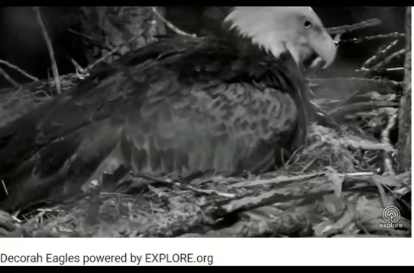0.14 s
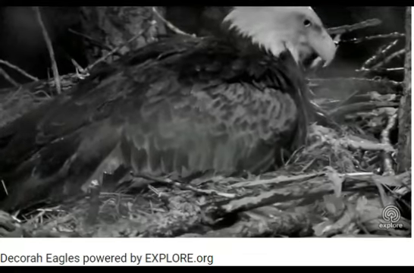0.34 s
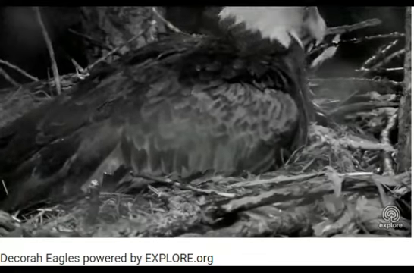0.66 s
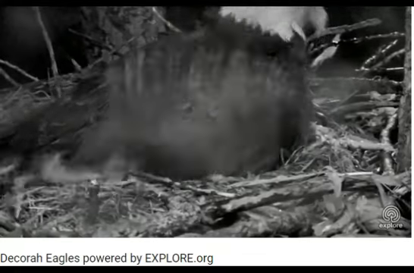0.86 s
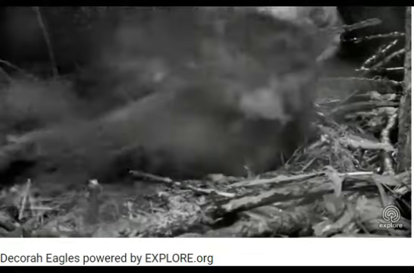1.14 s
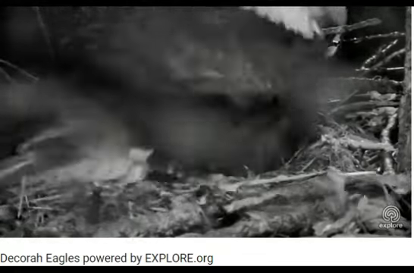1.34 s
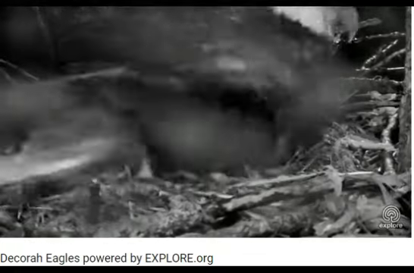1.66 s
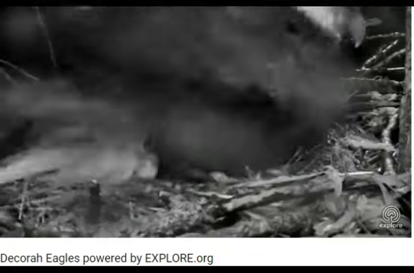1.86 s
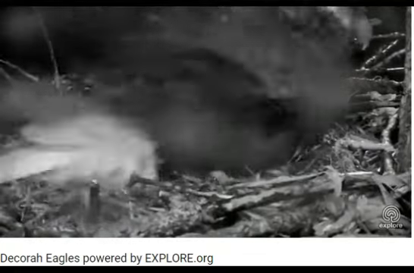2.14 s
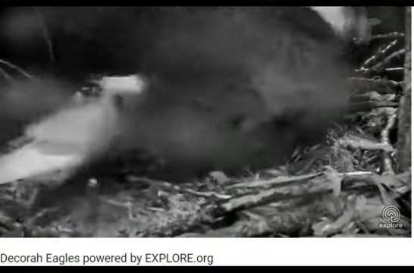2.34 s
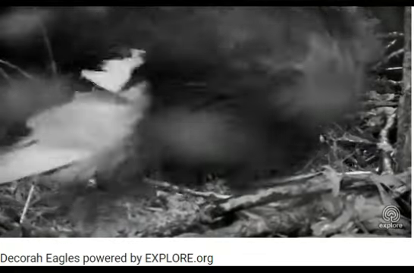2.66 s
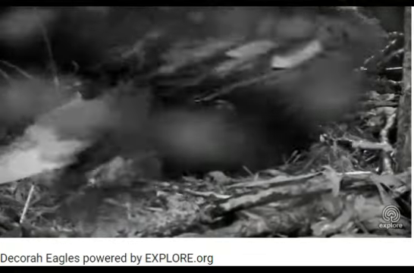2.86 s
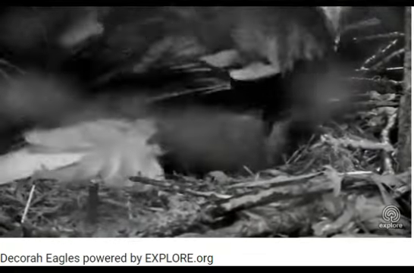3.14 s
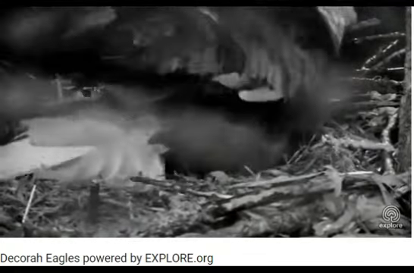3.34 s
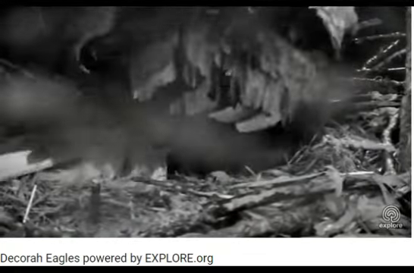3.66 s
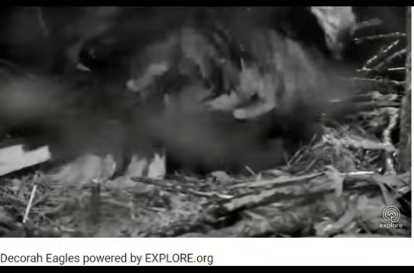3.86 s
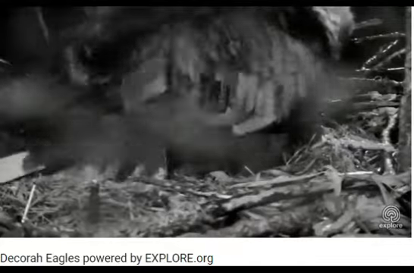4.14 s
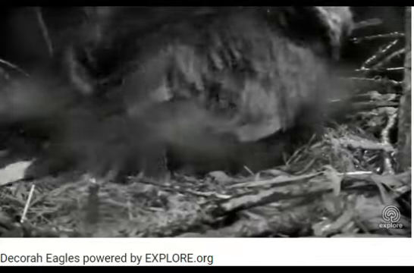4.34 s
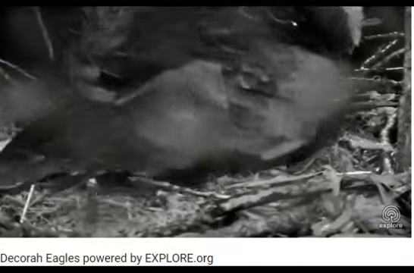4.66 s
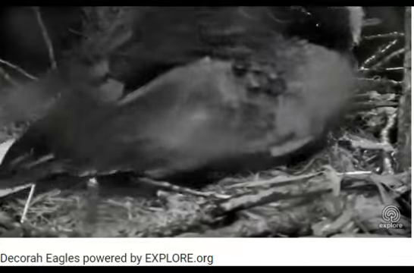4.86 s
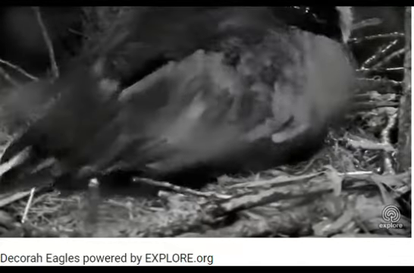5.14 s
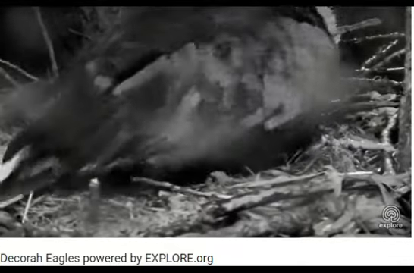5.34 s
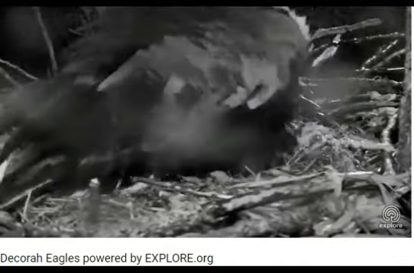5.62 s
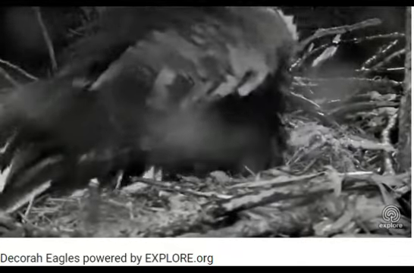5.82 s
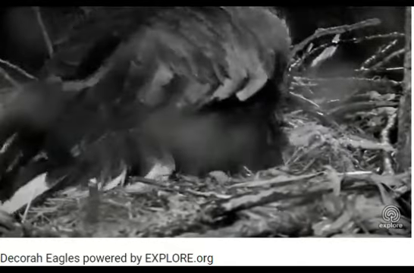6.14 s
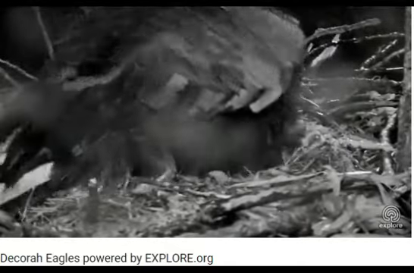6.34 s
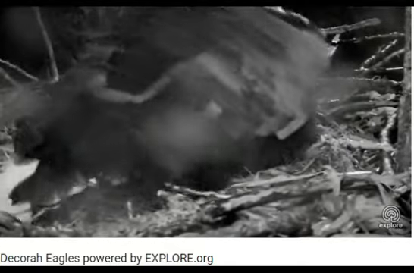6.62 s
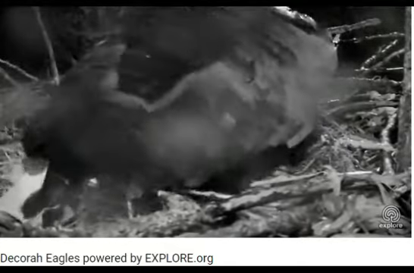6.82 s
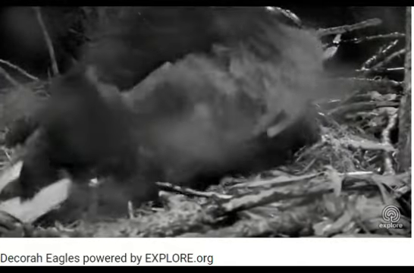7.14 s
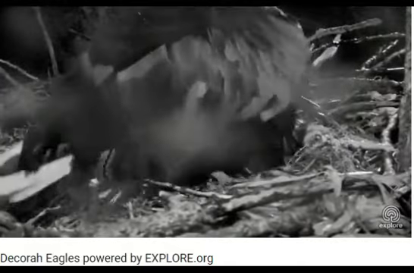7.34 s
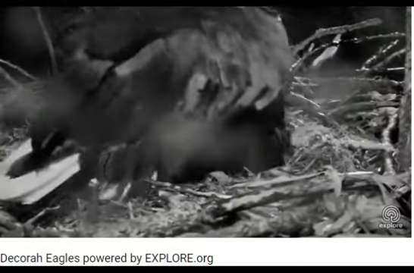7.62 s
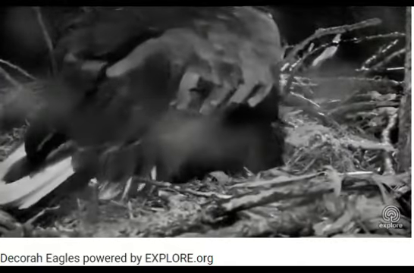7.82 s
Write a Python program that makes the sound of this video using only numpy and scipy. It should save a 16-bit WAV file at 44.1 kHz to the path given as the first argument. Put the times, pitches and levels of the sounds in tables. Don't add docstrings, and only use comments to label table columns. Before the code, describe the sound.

Rain hisses through a narrow, telephone-like microphone as a large wet bird rattles its feathers in a dense clattering burst, then rain and distant chirps continue.

```python
import sys
import numpy as np
from scipy import signal
from scipy.fft import rfft, irfft
from scipy.io import wavfile
from scipy.ndimage import uniform_filter1d

SR = 44100
rng = np.random.default_rng(int(sys.argv[2]) if len(sys.argv) > 2 else 0)


def ratio(d):
    e = np.asarray(d, float) / 20
    return 10 ** e


def master_out(mix):
    frames = np.transpose(np.atleast_2d(mix))
    ceiling = np.clip(frames, -1, 1)
    pcm = np.round(ceiling * 32767).astype(np.int16)
    wavfile.write(sys.argv[1], SR, pcm)


N = 352359

# t/s, rain level/dB, wind level/dB
WEATHER = [
    (0.0, -36, -41),
    (0.35, -35.5, -45.5),
    (2.6, -36.5, -45),
    (3.05, -35.5, -47),
    (3.7, -35, -43.5),
    (4.36, -37, -47),
    (5.0, -38, -46),
    (7.99, -38, -45.5),
]
# t/s, rustle level/dB, length/s
SWINGS = [(2.853, -33.5, 0.051), (2.908, -34, 0.073), (3.006, -33, 0.028), (3.07, -37, 0.015),
          (3.111, -40, 0.023), (3.139, -26, 0.019), (3.189, -32.5, 0.047), (3.283, -33.5, 0.04),
          (3.348, -35.5, 0.044), (3.433, -33, 0.04), (3.48, -34.5, 0.048), (3.576, -34, 0.052),
          (3.635, -31.5, 0.017), (3.707, -31, 0.028), (3.785, -33, 0.027), (3.861, -33.5, 0.051),
          (3.932, -35.5, 0.021), (4.074, -45, 0.012), (4.161, -39.5, 0.046), (4.219, -38.5, 0.054),
          (4.33, -44, 0.05), (4.406, -59, 0.017)]


def evened(x):
    return x / np.sqrt(np.mean(x ** 2) + 1e-20)


def read(points, hz):
    f, value = np.transpose(points)
    return np.interp(np.log(hz + 1), np.log(f + 1), value)


def curve(rows, axis):
    return np.interp(np.arange(N) / SR, np.array(rows)[:, 0], np.array(rows)[:, axis])


def coloured(x, points):
    hz = abs(np.fft.fftfreq(8192, 1 / SR))
    log_gain = np.log(ratio(np.maximum(read(points, hz), -70)))
    taps = np.fft.ifft(np.exp(np.conj(signal.hilbert(log_gain)))).real
    return evened(signal.oaconvolve(x, taps)[:N])


def add(mix, s, sound):
    part = mix[round(s * SR):][:len(sound)]
    part += sound[:len(part)]


def grains(per_s, spread_db):
    size = ratio(spread_db * np.minimum(rng.exponential(1, N), 5)) * rng.choice([-1., 1.], N)
    return evened(size * (rng.random(N) < per_s / SR))


def flicker(length_s):
    size = max(int(length_s * SR), 2)
    smooth = uniform_filter1d(rng.standard_normal(N), size)
    return evened(uniform_filter1d(smooth, size))


def rain():
    # f/Hz, level/dB
    rain_colour = [(120, -14.5), (200, -6.5), (566, -9.5), (867, -12), (1140, -9), (1350, -1.5), (1520, 3),
                   (1750, -4.5), (2330, -15), (2960, -13.5), (3500, -21), (3820, -29.5), (4000, -32.5),
                   (5200, -52)]
    wash = rng.standard_normal(N) * ratio(1.0 * flicker(0.023))
    near_drops = ratio(-6.0) * grains(1500, 2.27)
    return ratio(curve(WEATHER, axis=1)) * coloured(wash + near_drops, rain_colour)


def wind():
    # f/Hz, level/dB
    wind_colour = [(12, 1), (20, -2), (42, -3.5), (87, -4.5), (189, -3.5), (400, -7), (520, -10),
                   (880, -120)]
    gust_db = 0.94 * flicker(0.16)
    rumble = coloured(rng.standard_normal(N), wind_colour)
    return ratio(curve(WEATHER, axis=2) + gust_db) * rumble


def songbirds():
    # t/s, length/s, first f/Hz, last f/Hz, level/dB
    bird_notes = [(.14, .18, 3780, 3780, -61), (2.122, .042, 2760, 2460, -45), (2.16, .02, 3900, 3350, -56),
                  (2.2, .08, 3080, 2550, -50), (2.35, .028, 2700, 2900, -49),
                  (2.375, .028, 2900, 2600, -47), (2.505, .02, 3600, 3400, -53),
                  (5.595, .042, 2950, 2520, -47), (5.684, .023, 2450, 3980, -47),
                  (5.704, .014, 3960, 3990, -61), (5.715, .04, 2950, 2570, -47),
                  (5.83, .03, 2700, 2960, -49), (5.965, .02, 2700, 2550, -51),
                  (6.05, .043, 1950, 2170, -48), (6.088, .043, 2170, 1850, -48),
                  (6.1, .04, 2700, 2440, -51), (6.16, .06, 3130, 2340, -54), (7.005, .03, 3050, 2890, -48),
                  (7.265, .06, 3960, 3985, -59), (7.31, .02, 2700, 2350, -52),
                  (7.362, .022, 2800, 3960, -52), (7.384, .03, 3880, 3840, -54),
                  (7.425, .012, 3000, 2600, -52), (7.695, .03, 1710, 1710, -42)]
    bend = 1.41
    out = np.zeros(N)
    for s, length, first_hz, last_hz, db in bird_notes:
        u = np.linspace(0, 1, int(length * SR))
        hz = last_hz + (first_hz - last_hz) * (1 - u) ** bend
        whistle = np.sin(2 * np.pi * np.cumsum(hz) / SR) * signal.windows.tukey(len(u), .45)
        add(out, s, ratio(db + 3) * whistle)
    return out * ratio(2.2 * flicker(.008))


def vane_crackle():
    return (.6 * rng.standard_normal(N) + grains(1800, 3.2)) * ratio(3 * flicker(.004))


def feathers():
    # f/Hz, level/dB
    feather_colour = [(120, -34), (200, -30), (318, -25), (506, -16), (559, -20), (610, -8), (1140, -20),
                      (1490, 6.5), (1820, 2.5), (2640, 1), (2960, -2.5), (3230, 2.5), (4000, -19.5),
                      (5200, -58), (8800, -120)]
    # t/s, level/dB
    rustle = [
        (2.7, -54.5),
        (2.874, -37.5),
        (3.0, -36),
        (3.044, -36.5),
        (3.742, -40),
        (4.112, -43),
        (4.286, -57),
        (4.6, -50.5),
    ]
    rise_share = 0.82
    t = np.arange(N) / SR
    inside = (t > rustle[0][0]) & (t < rustle[-1][0])
    power = inside * ratio(2 * curve(rustle, axis=1) - 5)
    for s, db, length in SWINGS:
        side = np.where(t < s, rise_share, 2 - rise_share)
        spread_s = 0.29 * max(length, .005) * side
        power = power + ratio(2 * db) * np.exp(-((t - s) / spread_s) ** 2)
    dull, bright = vane_crackle(), vane_crackle()
    b, a = signal.butter(2, 2100, fs=SR)
    drive = bright + signal.filtfilt(b, a, dull - 0.95 * bright)
    return ratio(3.5) * np.sqrt(power) * coloured(drive, feather_colour)


def all_snaps():
    # t/s, peak level/dB, low housing ring/dB, dull knock/dB
    hard_snaps = [(2.8587, -15, 4, 1), (2.8626, -17, 11, 12), (2.8996, -9.5, 8, -2), (2.9095, -10, 11, -11),
                  (3.0054, -14, -1, 18), (3.073, -12.5, 14, 2), (3.1024, -16, 11, -6),
                  (3.1337, -5.5, -10, -10), (3.1352, -7, 0, -13), (3.137, -4.5, 0, 3),
                  (3.139, -3.5, -5, -4), (3.2054, -16, 10, 5), (3.2692, -11.5, 5, 5),
                  (3.2719, -5.5, 0.5, -1), (3.2768, -10, 9, 9), (3.285, -14, 5, 5), (3.351, -8, 4.5, -6),
                  (3.4137, -11.5, -6, -8), (3.4249, 5, -5.5, -7.5), (3.4256, -3, -21, -10),
                  (3.4277, -8, 15, 5), (3.478, -11, 19, 5), (3.4851, -13.5, 17, 12), (3.4909, -15, 13, 6),
                  (3.5737, -7.5, -4, -1.5), (3.644, -19, -2, -2), (3.6929, -14.5, 6, 3),
                  (3.7068, -12, 0, -3), (3.8721, -14.5, 3, 2), (4.0081, -16, 15, 8)]
    hard = np.array(hard_snaps)
    rebounds = hard + [0.001814, -12, 7.5, 7.5]
    s, db, length = np.repeat(SWINGS, 6, axis=0).T
    when, size, ring, knock = rng.standard_normal((len(s), 4)).T
    dull_db = 5.5
    ticks = np.transpose([s + .7 * length * np.clip(when, -.8, 3.0),
                          db + 6.5 + 2.5 * size,
                          dull_db * (1 + ring),
                          dull_db * (1 + knock)])
    return np.vstack([hard, rebounds, ticks])


def snaps():
    # f/Hz, width/Hz, level/dB
    housing = [
        (1500, 170, -5),
        (2350, 350, -4),
        (2940, 290, 0),
        (3350, 500, -11),
    ]
    # f/Hz, width/Hz, level/dB
    twig_knock = (650, 550, -15)
    # f/Hz, width/Hz, level/dB
    nest_thump = (550, 760, -30)
    colour_db = 3.5
    out, t = np.zeros(N), np.arange(900) / SR
    rows = all_snaps()
    chance = rng.standard_normal((len(rows), 60))
    high_pass = signal.butter(2, 1300, "high", fs=SR)

    def mode(hz, width, db):
        return ratio(db) * np.exp(-np.pi * width * t) * np.sin(2 * np.pi * hz * t)

    for (s, db, low_db, knock_db), luck in zip(rows, chance):
        blow = (np.exp(-t[:60] / .00007) + .3 * luck) * np.exp(-t[:60] / .0005)
        ring = np.zeros(len(t))
        for (hz, width, mode_db), tint in zip(housing, luck[-5:]):
            tint_db = colour_db * tint * (db < -13)
            ring += mode(hz, width, mode_db + low_db * (hz < 2000) + tint_db)
        ring = signal.lfilter(*high_pass, ring)
        knock = ratio(knock_db + 5.5) * (mode(*twig_knock) + mode(*nest_thump))
        sound = np.sign(luck[-1]) * np.convolve(blow, ring + knock)
        peak = ratio(db - 1.2 * (db < 0))
        add(out, s + .0001, peak * sound / abs(sound).max())
    return out


def scene():
    return (rain() + wind() + songbirds() + feathers() + snaps())[None]


def link(x):
    rate_hz, edge_hz = 8000, 500
    hz = np.fft.rfftfreq(N, 1 / SR) + 1e-3
    band_power = np.clip(.5 + (rate_hz / 2 - hz) / edge_hz, 0, 1)
    band = irfft(rfft(x) * np.sqrt(band_power), N)
    turn = 2 * np.pi * rate_hz * np.arange(N) / SR
    mirrored = band * (1 + 2 * np.cos(turn) + 2 * np.cos(2 * turn))
    folded = abs(hz - rate_hz * np.round(hz / rate_hz))
    upper_db = 3.8 * (hz > rate_hz) + 2.8 * (hz > 1.5 * rate_hz)
    return irfft(rfft(mirrored) * (folded / hz) ** 2.906 * ratio(upper_db), N)


def thin_treble(x):
    thin_moments = [0.688, 1.05, 1.374, 1.736, 2.654, 3.525, 4.021, 4.15, 4.49, 5.106, 5.216, 5.338, 5.49, 5.555,
                    5.829, 5.939, 6.046, 6.131, 6.278, 6.428, 6.513, 6.64, 6.857, 6.939, 7.071, 7.194, 7.411,
                    7.707]
    out, size = x.copy(), 1500
    window, hz = signal.windows.tukey(size, .85), np.fft.rfftfreq(size, 1 / SR)
    treble = np.clip((hz - 1700) / 500, 0, 1)
    for s in thin_moments:
        at = round(s * SR) - size // 2
        z = rfft(x[at:at + size] * window)
        step = uniform_filter1d(abs(z), size=41) * ratio(10 + 2.5 * (hz > 3400))
        rounded = np.round(abs(z) / step) * step * z / abs(z)
        out[at:at + size] += .78 * irfft((rounded - z) * treble, size)
    return out


def band_limit(x):
    return signal.sosfilt(signal.butter(12, 17010, fs=SR, output="sos"), x)


def record(dry):
    # t/s, tick level/dB
    joints = [
        (2.906, -23),
        (3.1375, -31),
        (5.3144, -32),
    ]
    overloaded = np.clip(link(dry[0]), -.7, .7)
    x = thin_treble(overloaded) + ratio(-70) * rng.standard_normal(N)
    for s, db in joints:
        add(x, s, ratio(db) * np.array([1., -.5]))
    edge = signal.firwin(1023, 15750, window=("kaiser", 10), fs=SR)
    mix = signal.oaconvolve(x, edge, "same")[None]
    return band_limit(mix)


dry = scene()
out = record(dry)
master_out(out)
```